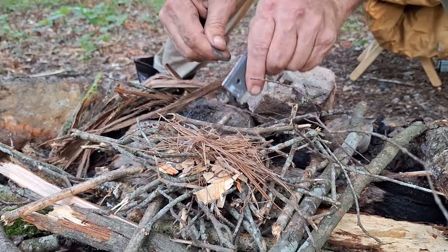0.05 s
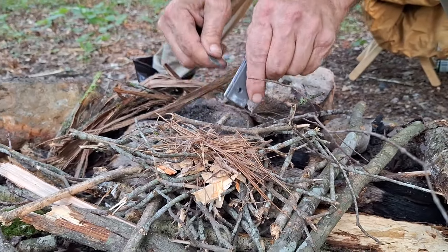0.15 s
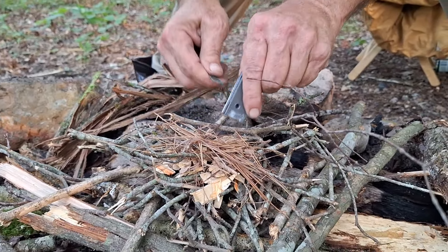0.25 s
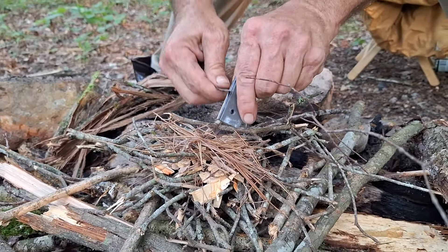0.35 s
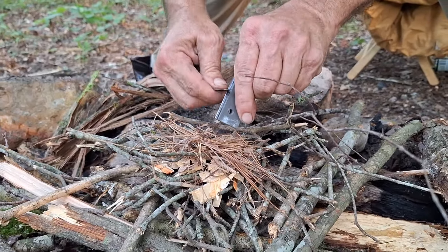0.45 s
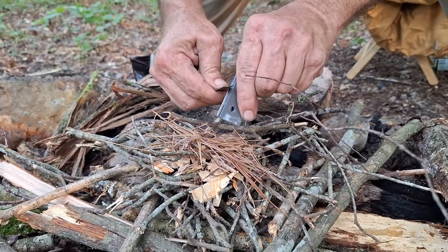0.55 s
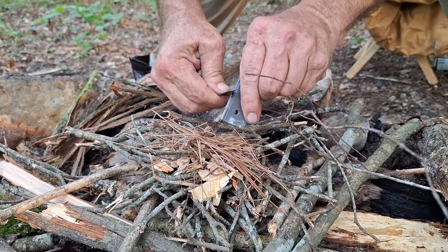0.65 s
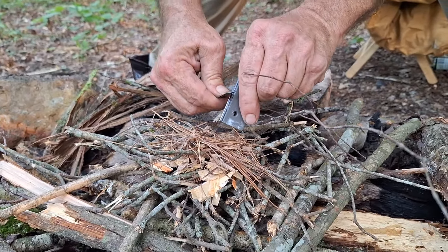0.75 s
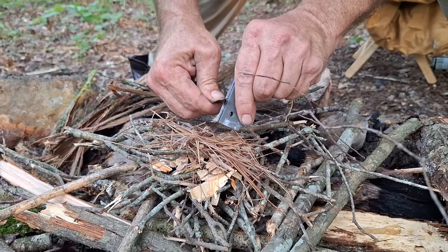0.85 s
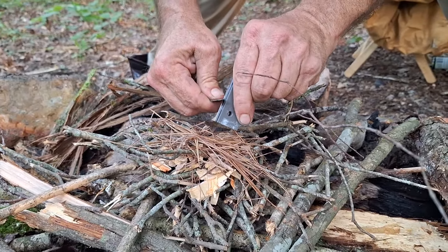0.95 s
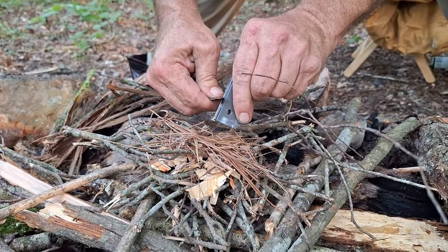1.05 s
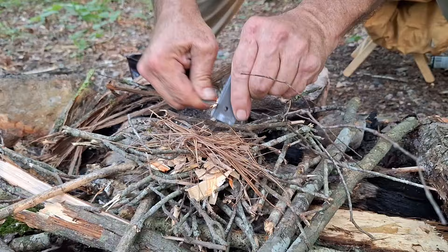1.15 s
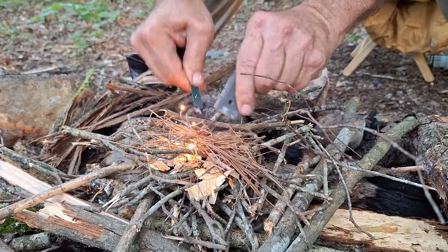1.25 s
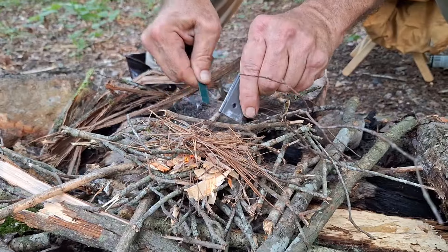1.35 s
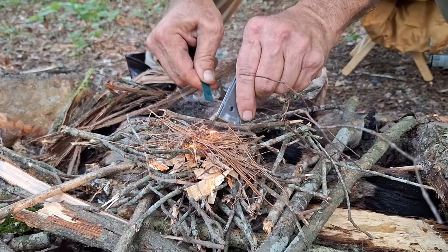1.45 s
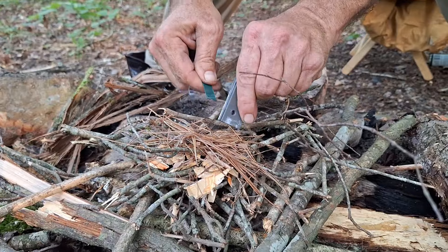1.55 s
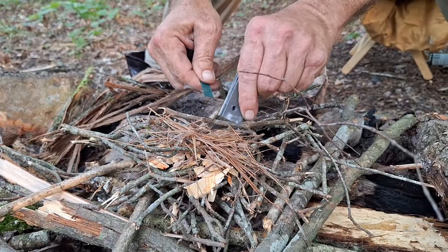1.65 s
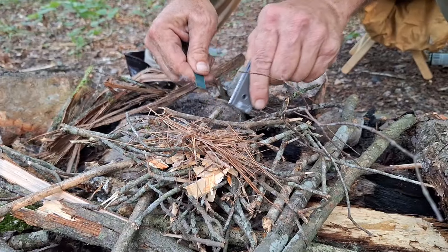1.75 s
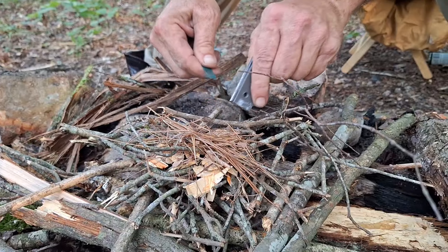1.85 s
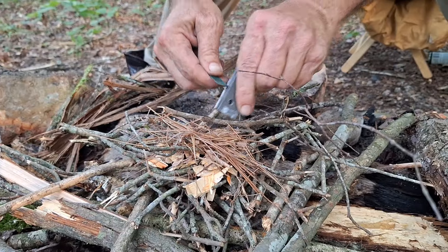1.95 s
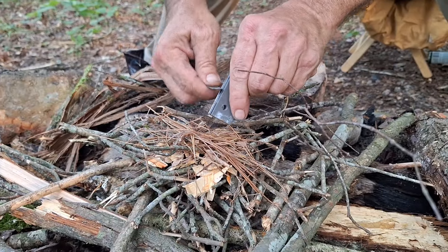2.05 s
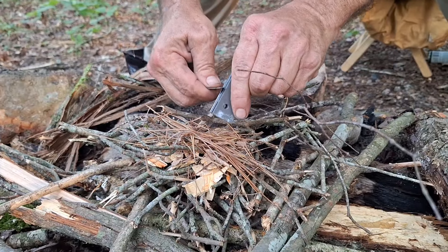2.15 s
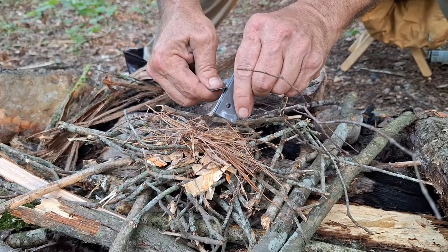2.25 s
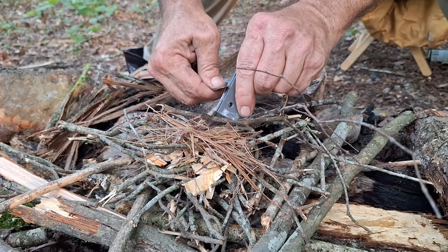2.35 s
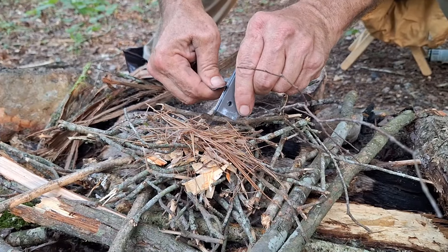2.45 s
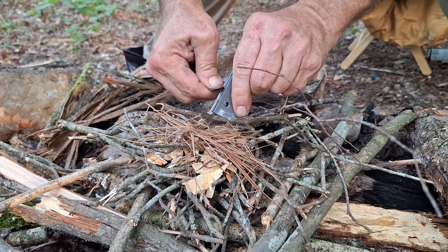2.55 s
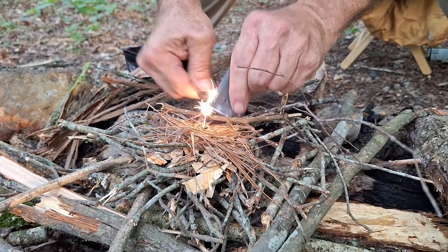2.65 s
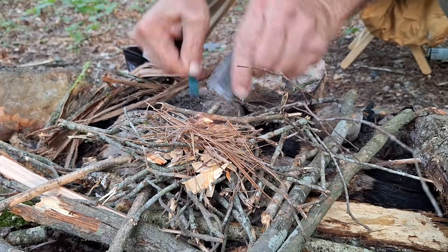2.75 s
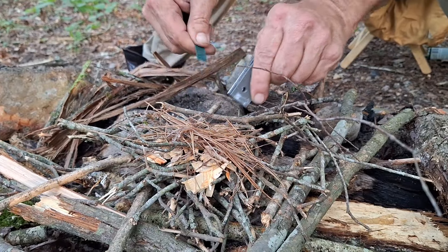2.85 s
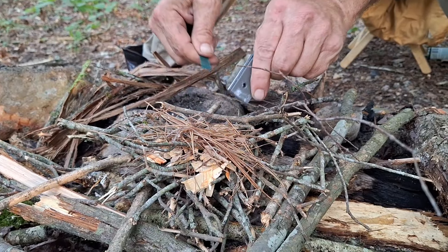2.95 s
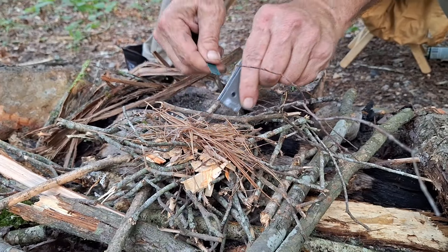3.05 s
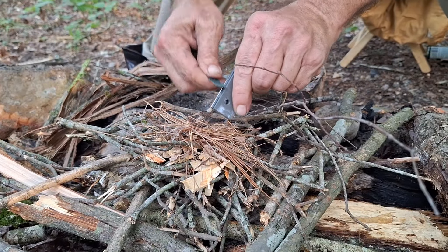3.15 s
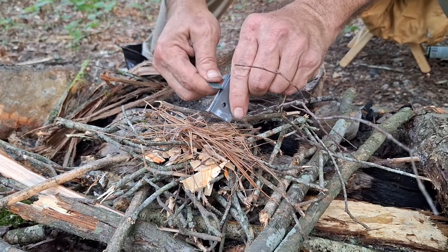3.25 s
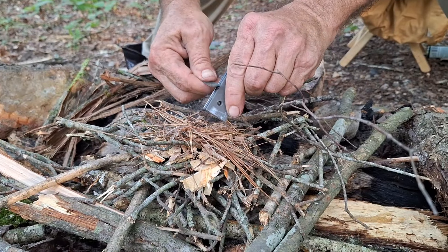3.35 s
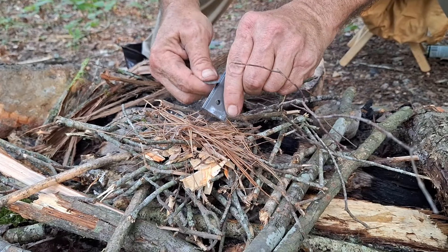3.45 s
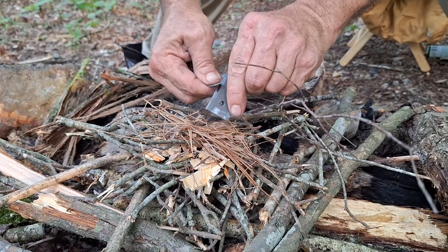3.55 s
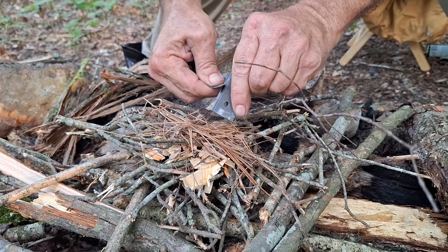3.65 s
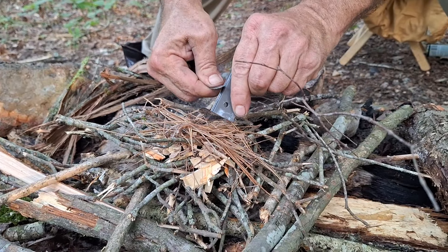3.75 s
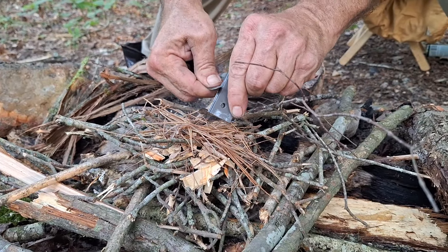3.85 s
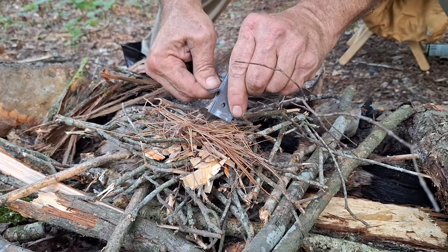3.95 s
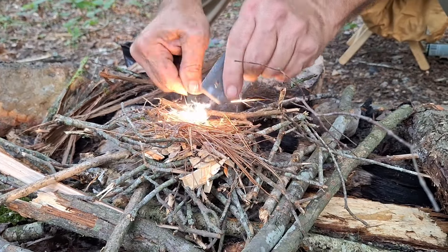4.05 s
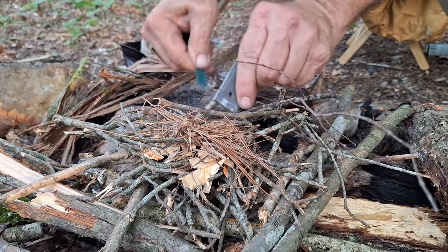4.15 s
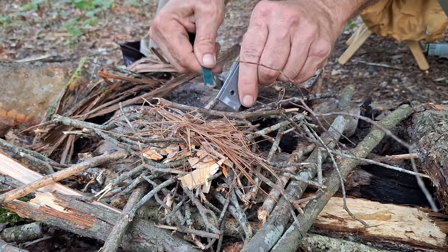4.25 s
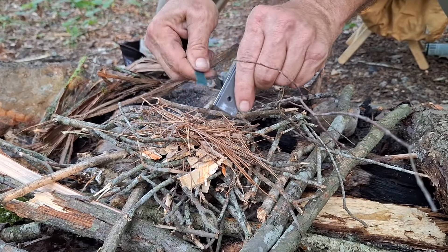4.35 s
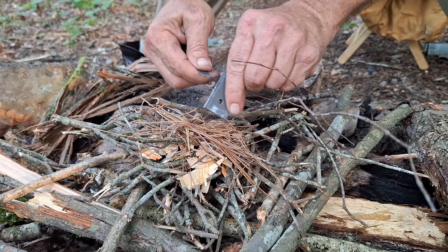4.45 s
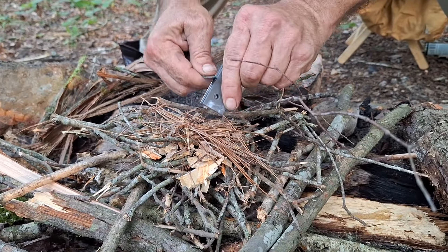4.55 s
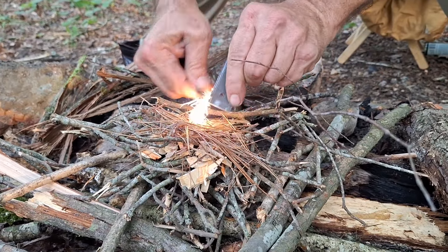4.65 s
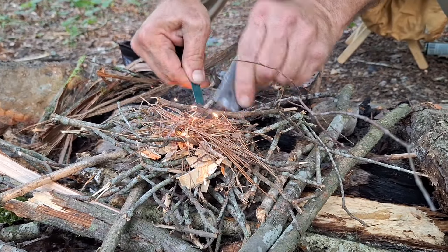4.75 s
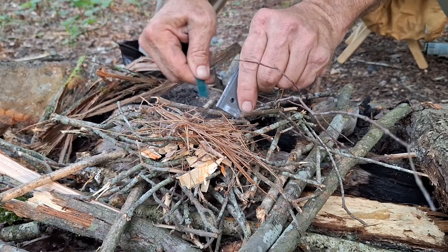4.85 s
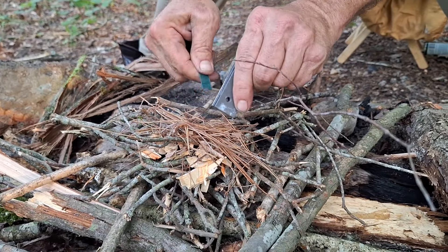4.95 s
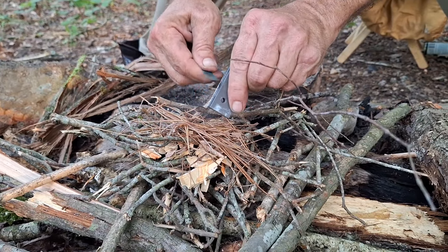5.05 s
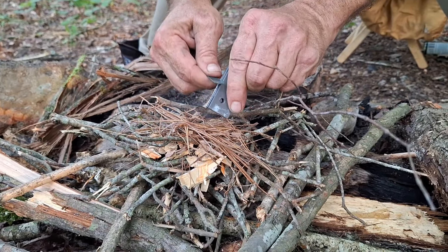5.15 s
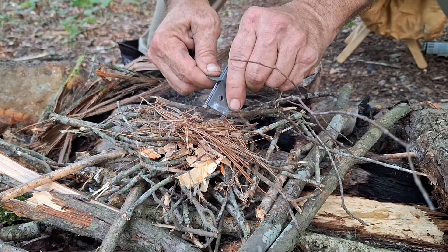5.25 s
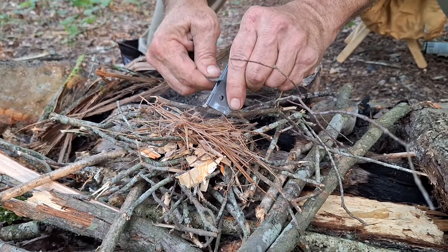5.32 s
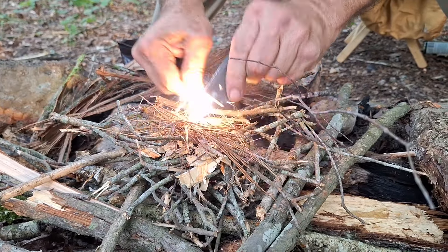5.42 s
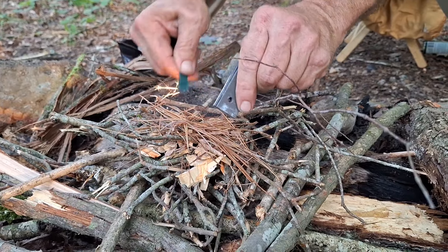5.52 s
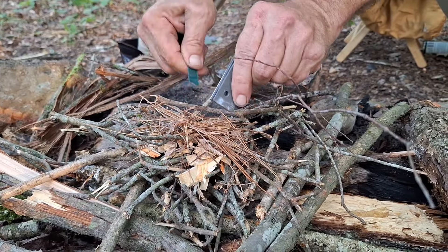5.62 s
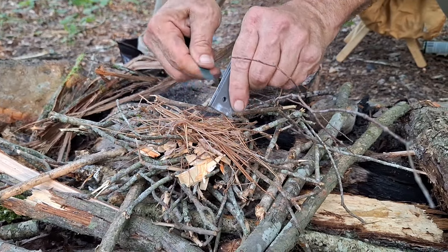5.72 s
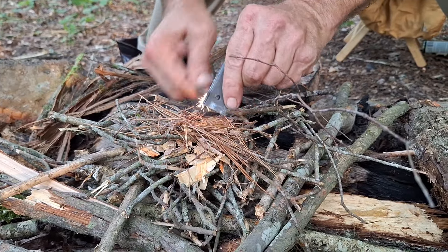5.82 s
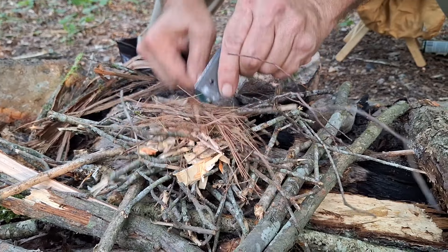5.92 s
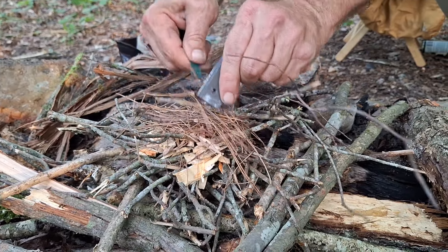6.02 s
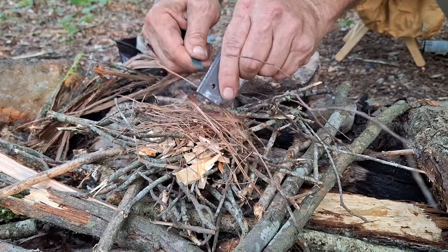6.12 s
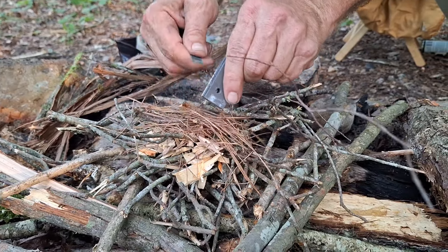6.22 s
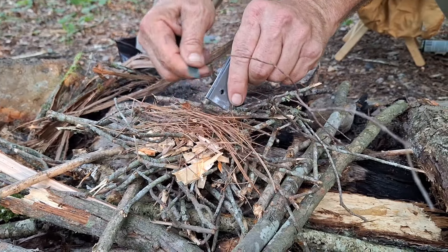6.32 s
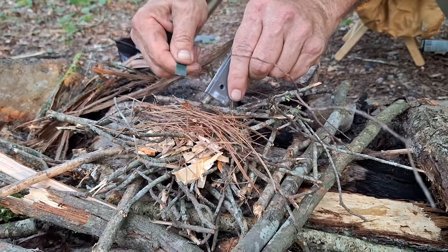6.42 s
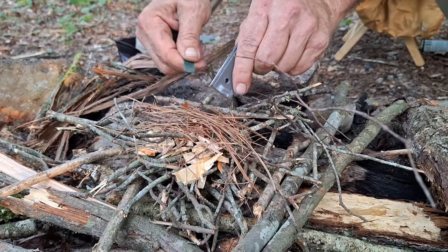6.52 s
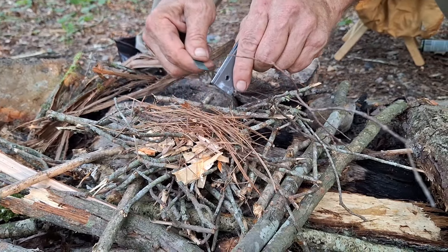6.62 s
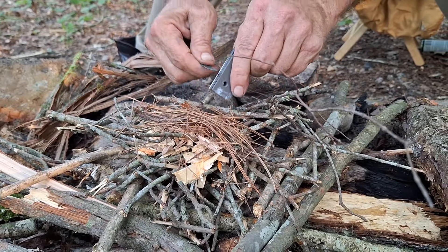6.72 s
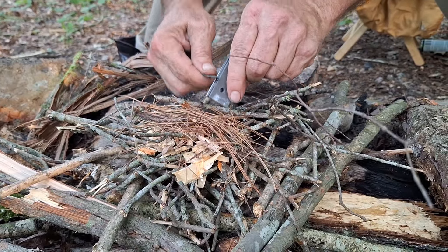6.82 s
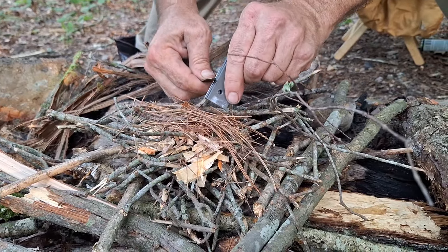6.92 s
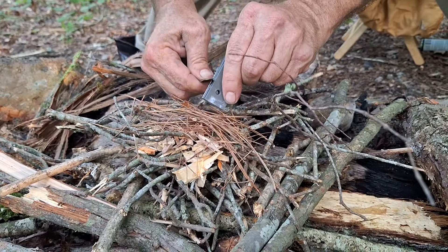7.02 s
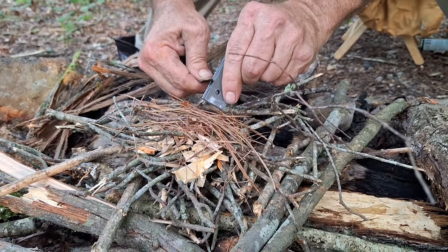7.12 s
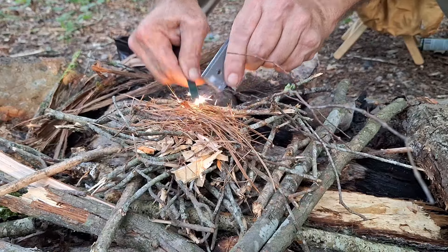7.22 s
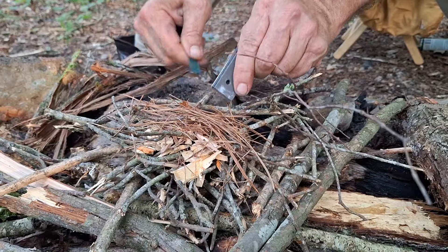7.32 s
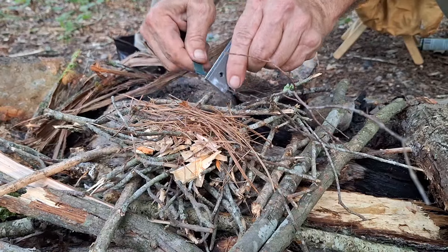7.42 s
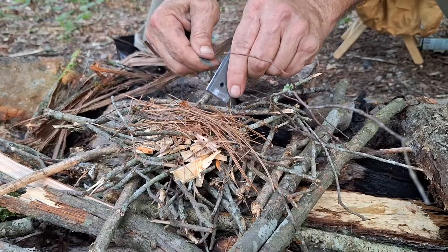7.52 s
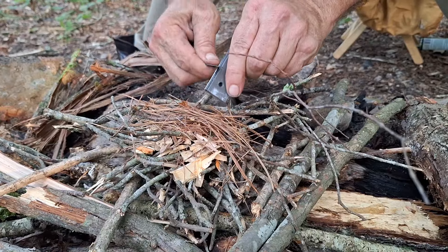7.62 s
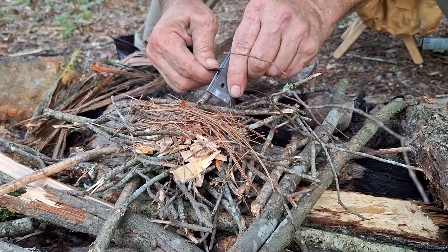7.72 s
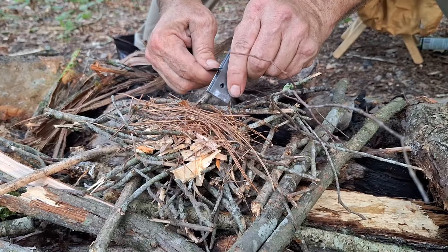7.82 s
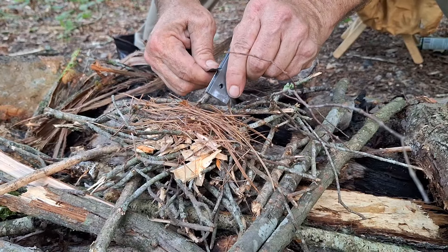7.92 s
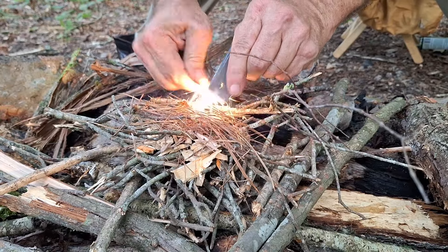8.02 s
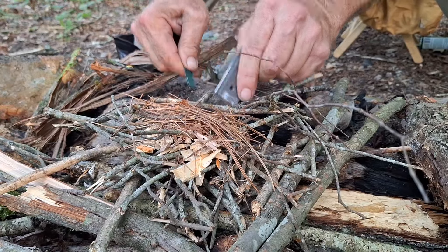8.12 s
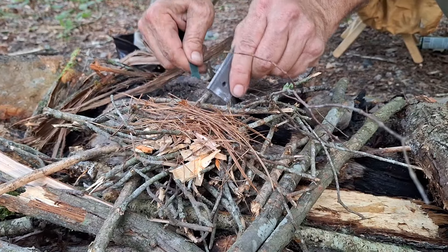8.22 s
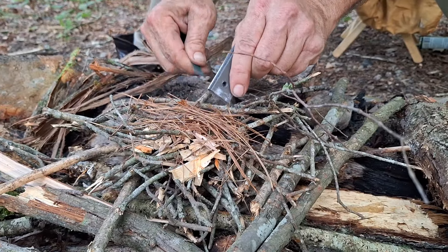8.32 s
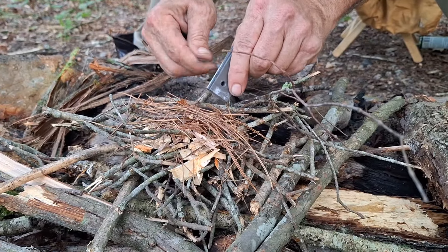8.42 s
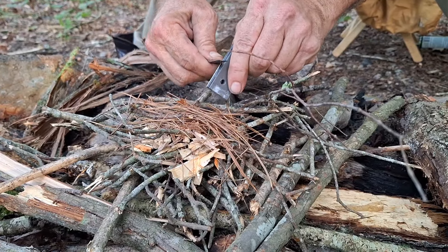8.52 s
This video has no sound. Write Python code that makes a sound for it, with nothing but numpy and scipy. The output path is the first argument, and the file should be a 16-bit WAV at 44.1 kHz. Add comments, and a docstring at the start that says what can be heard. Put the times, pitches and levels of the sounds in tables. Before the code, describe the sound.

A fire rod is struck over dry tinder: eight abrupt, harsh metal scrapes, each over in about a tenth of a second, starting slightly hesitantly then bursting into bright crackling sizzle with a soft low bump. Between them come small ticks, faint rubs and barely audible twig rustles. Close and dry, slightly stronger on the right, with little woodland echo, over quiet hiss, thin insect shimmer and two very faint high whistles.

```python
"""Dry litter rustles first, then a high whistle glides by and light knocks and rubs of steel come in.
From 1.2 s to 8.2 s a steel scraper is driven eight times down a ferro rod, close by, over dry tinder.
Each stroke is stick-slip noise and micro-impacts exciting ringing steel, with fizzing sparks and a thud.
A second whistle glides by near 6.5 s; more knocks, rubs and rustles fall between the strokes.
Throughout, filtered noise gives shrill insects and soft air, and a wavering low sine comes and goes."""
import sys
import numpy as np
from scipy import signal
from scipy.fft import rfft, irfft
from scipy.io import wavfile
from scipy.ndimage import uniform_filter1d

SR = 44100
rng = np.random.default_rng(int(sys.argv[2]) if len(sys.argv) > 2 else 0)


def master_out(mix):
    """Clip the mix to full scale and print it as 16-bit PCM to the path in sys.argv[1]."""
    frames = np.transpose(np.atleast_2d(mix))
    ceiling = np.clip(frames, -1, 1)
    pcm = np.round(ceiling * 32767).astype(np.int16)
    wavfile.write(sys.argv[1], SR, pcm)


N = 378276
HZ = np.fft.rfftfreq(4096, 1 / SR)  # grid on which filters are designed

# All levels are relative: the layer gains and filters below act on them too.
# Strokes: touch t/s, break-loose t/s, run/s, grinding level/dB, build-up/(dB/s), ease-off/(dB/s);
# above the grinding: creeping body/dB, running body/dB, spark fizz/dB, thud/dB;
# recoil: delay after the run/s, grinding level/dB, thud level/dB
STROKES = [(1.214, 1.264, 0.018, -38.5, 310, 520, -5.5, -0.5, 7.4, -7.5, 0.041, -42.5, -49),
           (2.715, 2.735, 0.029, -36.5, 872, 474, -7.5, -7, 7, -13.5, 0.022, -52.5, -46),
           (4.059, 4.100, .018, -37, 121.8, 487, -2.5, -3, 6.7, -9, .021, -52.5, -51),
           (4.686, 4.738, 0.037, -37.5, 321.3, 300.4, -2, -0.5, 10.8, -3, 0.024, -46, -50),
           (5.406, 5.455, 0.048, -38, 320, 728, -9.5, -2.5, 8.5, -9, 0.0096, -52.5, -63),
           (5.869, 5.903, .026, -35, 343, 560, -13, -4.5, 5.7, -18, 0.025, -56, -60),
           (7.21, 7.249, 0.025, -39.5, 431.6, 498, -3.5, -1.5, 6.6, -12, 0.023, -54, -49.5),
           (8.049, 8.099, 0.0087, -33.5, 372, 862, -1.5, -3, 7.6, -16, 0.045, -48.5, -49)]
# Hard snags of the edge on the rod: t/s, level/dB, brightness/dB
SNAGS = [(1.2179, -27, -3), (1.2319, -17.5, -4), (1.2451, -30, -1), (1.2638, -12, -0.5), (1.3201, -25, 11),
         (2.729, -28, -6), (2.7509, -6.5, 3.5), (2.7803, -20.5, 0), (4.0427, -29.5, 3), (4.0657, -27, 7),
         (4.092, -24, 11), (4.6918, -35, -15), (4.715, -20.5, -4), (4.721, -16.5, -10), (4.7286, -15, -7.5),
         (4.7434, -15, -1), (5.4312, -43, .5), (5.443, -17, -2), (5.4538, -10.5, -4), (5.8697, -33.5, 15),
         (5.887, -18, -4), (5.902, -27, 1), (5.9357, -24, 13), (7.219, -23.5, -25), (7.233, -24, -10),
         (7.2439, -18.5, -10), (7.2928, -26, 6.5), (8.0508, -30.5, 6), (8.0555, -19, -12),
         (8.0645, -20, -11), (8.0699, -13, -3), (8.0827, -12.5, 3), (8.0998, -6.5, -5), (8.1513, -28, 4)]
# Light knocks of scraper on rod: t/s, level/dB, brightness/dB, body/dB, decay/s
KNOCKS = [(0.29, -49.5, 13, 3, .0015), (0.4121, -36, -15, -10, 0.0033), (0.6726, -35, -4, -6, 0.0018),
          (1.4827, -16.5, 0.5, -20.5, 0.0027), (2.048, -38.5, -22, -10, 0.0023),
          (3.9927, -26, -7, -1, 0.0024), (4.0319, -39, -2, -2, .0015), (4.5849, -30.5, -5, -17.5, 0.0022),
          (5.5627, -37, 3, 3, 0.0019), (5.5726, -29.5, 7, 4, 0.0035), (6.1332, -36.5, -20, 3, 0.0018),
          (6.852, -48, 4, -11, .0014), (7.325, -35.5, 7, 6, 0.0017), (7.6895, -41, -6, -15, 0.0015),
          (8.042, -33, 4, -10, .0014), (8.554, -37.5, -5, -1, 0.0023)]
# Light slides of the scraper into place: t/s, length/s, level/dB, brightness/dB
RUBS = [(0.646, .012, -64.5, -10), (0.804, 0.019, -64, -2), (0.835, 0.073, -59, 5),
        (1.479, 0.0044, -45.5, 0), (3.293, 0.064, -70, -5), (3.988, 0.056, -61, -3),
        (5.573, 0.044, -60.5, 7), (6.126, 0.086, -72.5, -7), (8.566, 0.008, -49.5, -21)]
# Spectrum of steel on rod: f/Hz, level/(dB per Hz)
RASP_SPECTRUM = [(100, -33.5), (350, -10.5), (650, -4), (1200, -4), (1900, -1.5), (2500, -6), (2950, -4.5),
                 (3500, 3.5), (7500, 2), (9800, -1), (12200, 3.5), (14000, 7), (16000, 3.5)]
# Resonances of scraper and rod: f/Hz, width/Hz, level/dB
STEEL_MODES = [(662, 170, -11.5), (1850, 90, 2.5), (3440, 170, -25), (4810, 150, -12.5), (5270, 139, -5),
               (8600, 240, -4.5), (10750, 370, -6.5), (13950, 290, -8), (14730, 200, 1.5)]
# Resonances that change with grip and footing: t/s, f/Hz, width/Hz, level/dB
GRIP_MODES = [(1.28, 14550, 397, -3), (2.76, 1000, 400, 0), (2.76, 7780, 350, 4), (2.76, 8800, 300, -1),
              (2.759, 14800, 298, -8), (4.768, 163.5, 70, 5), (4.77, 693, 198.5, -3.5),
              (5.48, 4340, 200, 0.5), (5.48, 8560, 250, -14.5), (5.919, 308, 59.5, 9),
              (5.92, 2080, 70.25, -1), (5.92, 8650, 300, -13), (7.27, 10710, 149.7, 0),
              (8.101, 1895, 148.7, -2), (8.099, 4620, 250, -12), (8.10, 9000, 180, -3)]
# Stereo balance of the steel, right mostly louder: f/Hz, left minus right level/dB
STEEL_BALANCE = [(100, -4), (600, 0.5), (1200, -1), (2000, -7.5), (2700, -3.5), (4000, -11.5), (6500, -7.5),
                 (9000, -17.5), (11000, -16), (15000, -16.5)]
# Spectrum of the ground under the rod: f/Hz, level/(dB per Hz)
GROUND_SPECTRUM = [(20, -34), (50, -2), (82, -1), (115, -2), (165, 0), (260, -5.5), (385, -10.5), (520, -7),
                   (1000, -12), (3000, -45)]
# Shifts of twigs and litter under the hands: t/s, length/s, level/dB
RUSTLES = [(0.0, 0.065, -65), (0.818, 0.15, -67.5), (3.44, 0.27, -74), (3.643, 0.44, -77.5),
           (4.188, 0.0051, -52.5), (5.96, 0.18, -73.5), (7.453, 0.15, -75)]
# Spectrum of the litter: f/Hz, level/(dB per Hz)
LITTER_SPECTRUM = [(60, -5), (200, 6), (480, 1.5), (800, -11), (2000, -5), (4000, -10), (12000, -16)]
# Reverberation of the trees: f/Hz, t60/s
WOODS_DECAY = [(100, 1), (1000, 0.52), (5000, 0.41), (15000, 0.37)]
# Insect chorus: f/Hz, level/(dB per Hz)
INSECT_SPECTRUM = [(4800, -44), (5600, -21.5), (5950, -12), (6150, -2.5), (6450, 2), (6850, -5),
                   (7300, 0.5), (7600, -7.5), (7950, -17.5), (8600, -34.5), (10000, -67)]
# Outdoor air: f/Hz, level/(dB per Hz)
AIR_SPECTRUM = [(20, -3.5), (70, 16.5), (150, 4), (260, 4.5), (600, -1), (1350, -3.5), (1850, 2.5),
                (2300, 6.5), (3400, -2.5), (5200, -6), (8500, -2.5), (11000, -5.5), (14200, 4), (16000, -9)]
# Stereo balance of the air: f/Hz, left minus right level/dB
AIR_BALANCE = [(60, -9.5), (110, 4), (200, 9), (380, 4), (700, 3), (1290, 0), (2380, -12.5), (4400, -4.5),
               (8120, -13.5), (15000, -15)]
# Coherence of the air between left and right: f/Hz, likeness
AIR_COHERENCE = [(60, 0.27), (300, 0.058), (1200, 0.13), (16000, 0.066)]
# Gliding whistles, one table each: t/s, f/Hz, level/dB
WHISTLES = [
    [(0.16, 11000, -82), (0.2, 11180, -71), (0.26, 11600, -80), (0.31, 11200, -75), (0.34, 10600, -76),
     (0.38, 10400, -72)],
    [(6.47, 10150, -91.5), (6.52, 11600, -81), (6.55, 12200, -76), (6.615, 10100, -78), (6.7, 8300, -87)],
]
# Course of the low hum: t/s, level/dB
HUM_LEVEL = [(0.0, -68), (0.09, -92), (0.2, -77), (0.59, -93), (0.91, -68), (1.61, -93.5), (1.81, -86),
             (2.11, -92), (2.72, -95), (2.989, -75), (3.08, -90), (3.579, -73), (4.22, -81), (4.688, -94),
             (4.88, -98), (5.01, -72), (5.12, -95), (5.311, -92), (5.44, -66), (5.58, -86), (5.8, -88),
             (6.01, -73), (6.239, -73.5), (6.49, -91), (6.941, -78), (7.55, -75), (7.78, -88.5),
             (8.05, -66), (8.3, -88), (8.57, -69)]

BREAK_DB, SAG_DB_PER_S = 5, 79  # jump as the edge breaks loose, loss of pressure along the run
SPARK_LAG_S = 0.002  # the chips take a moment to flare
THUD_BUILD_DB_PER_S, THUD_FALL_DB_PER_S = 770, 620
THUD_LEAD_S, THUD_HOLD_S = 0.0091, 0.013  # full this long before the run ends, and stays so this long
RECOIL_RISE_DB_PER_S, RECOIL_FALL_DB_PER_S = 1296.5, 580.5  # the hand springs back and grazes the rod
RECOIL_BODY_DB, RECOIL_FIZZ_DB = -3.5, 2.5  # above the recoil's grinding
LIFT_S, LIFT_DB_PER_S = .024, 297.5  # this long after the recoil the edge leaves the rod
CATCH_BODY_DB, CATCH_DECAY_S = -2.5, 0.0017  # low knock of a catch before the brightness trade, and decay
BODY_PER_BRIGHT = .35  # the brighter a catch, the less it knocks (dB per dB)
CHIPS_PER_S, CHIP_WINDOW_S = 75, .052  # mean rate of small snags, and how long they go on after the run
CHIP_DB, CHIP_SPREAD_DB, CHIP_BRIGHT_DB = 5.5, 4.5, 8  # peak above the fizz, spread each way, brightness
HUM_HZ = 147.6  # mean pitch
EDGE_HZ = 15900  # upper band limit


def stroke_gains():
    """Energy addition: run and short recoil sum in power, then the lift fades body, grind, fizz and thud."""
    gains = np.zeros((4, N))
    for (touch, loose, run, db, build, ease, creep_body, run_body, fizz, thud,
         recoil_s, recoil_db, recoil_thud_db) in STROKES:
        t = np.arange(touch - .02, touch + .3, 1 / SR)
        after = t - loose - run
        grind = db + pressure(t, touch, loose, run, build, ease)
        sparks = db + pressure(t, touch, loose + SPARK_LAG_S, run, build, ease)
        push = db + peaked(after + THUD_LEAD_S, THUD_BUILD_DB_PER_S, THUD_FALL_DB_PER_S, THUD_HOLD_S)
        body = grind + np.where(t < loose, creep_body, run_body)
        forward = amp([body, grind, sparks + fizz, push + thud])

        recoil = peaked(after - recoil_s, RECOIL_RISE_DB_PER_S, RECOIL_FALL_DB_PER_S)
        graze = recoil_db + recoil
        back = amp([graze + RECOIL_BODY_DB, graze, graze + RECOIL_FIZZ_DB, recoil + recoil_thud_db])
        lift = amp(-LIFT_DB_PER_S * np.maximum(after - recoil_s - LIFT_S, 0))
        add(gains, t[0], np.hypot(forward, back) * lift)
    return gains


def pressure(t, touch, loose, run, build, ease, rise_s=.0015):
    """Static, then sliding friction in dB: touch, creep under growing force, break loose, run, ease off."""
    jump = BREAK_DB * np.clip((loose - t) / rise_s, 0, 1)
    creeping = build * np.maximum(loose - t, 0) + jump
    running = SAG_DB_PER_S * np.clip(t - loose, 0, run) + ease * np.maximum(t - loose - run, 0)
    before_touch = 20 / np.log(10) * np.maximum(touch - t, 0) / rise_s
    return -creeping - running - before_touch


def peaked(age, rise_db_per_s, fall_db_per_s, hold_s=0):
    """Exponential growth and decay: a level in dB climbs to 0 at age 0, holds and falls."""
    return rise_db_per_s * np.minimum(age, 0) - fall_db_per_s * np.maximum(age - hold_s, 0)


def scraping(gains, body_db=11, grind_db=6, fizz_db=-1, chip_db=-0.5, shift_db=1.82):
    """Friction noise: the chattering edge tears off chips; the burning chips fizz on top."""
    chips = evened(amp(chip_db * wander(5200)))
    grains = registers(rng.standard_normal((2, N)) * chips) * teeth(gains[1])
    # the bite keeps changing colour
    levels = [amp(db + shift_db * wander(190)) for db in (body_db, grind_db, fizz_db)]
    return sum(band * gain * level for band, gain, level in zip(grains, gains, levels))


def teeth(force, rate_hz=400, full_db=-40, jitter=.4, size_db=-0.5, hold=1.0):
    """Stick-slip: each tooth bites at once and eases off; a light edge stutters, a forceful one runs on."""
    speed = np.clip(force / amp(full_db), .05, 1) ** .3
    turns = np.cumsum(rate_hz * speed * np.exp(jitter * wander(150))) / SR
    sizes = amp(size_db * rng.standard_normal(N))[turns.astype(int)]
    bite = hold * speed ** 2 + sizes * np.exp(-(turns % 1) / .3)
    return bite / np.sqrt(uniform_filter1d(bite ** 2, size=700) + 1e-9)  # local rms 1


def stalls(snags, depth, lead_s=0.0038, width_s=.002):
    """Static friction: the edge hangs just before each catch breaks loose, so the grinding gaps."""
    t, free = np.arange(N) / SR, np.ones(N)
    for s, *_ in snags:
        near = slice(int((s - .02) * SR), int((s + .01) * SR))
        dip = np.exp(-((t[near] - s + lead_s) / width_s) ** 2)
        free[near] *= 1 - np.clip(depth, 0, 1) * dip
    return free


def rub_gains(body_db=-12):
    """Light sliding friction: gains of body, grinding and fizz without pressure."""
    gains = np.zeros((3, N))
    for s, length, db, bright_db in RUBS:
        add(gains, s, amp([[db + body_db], [db], [db + bright_db]]) * swell(length))
    return gains


def small_catches(fizz):
    """Random point process: the edge keeps snagging along the run, its level following the spark fizz."""
    rows = []
    for _, loose, run, *_ in STROKES:
        gaps, sizes = rng.uniform(.5, 1.5, 24), rng.uniform(-1, 1, 24)
        for s, size in zip(loose + np.cumsum(gaps) / CHIPS_PER_S, sizes):
            if s < loose + run + CHIP_WINDOW_S:
                fizz_db = 20 * np.log10(fizz[int(s * SR)] + 1e-9)
                rows.append((s, fizz_db + CHIP_DB + CHIP_SPREAD_DB * size, CHIP_BRIGHT_DB))
    return rows


def catches(rows, level_db=-4):
    """Impulsive excitation: each snag or knock is a cluster of micro-impacts that builds and dies fast."""
    t, bursts = np.arange(900) / SR, np.zeros((3, 2, N))
    snags = []
    for s, db, bright_db in rows:
        body_db = CATCH_BODY_DB - BODY_PER_BRIGHT * bright_db
        snags.append((s, db, bright_db, body_db, CATCH_DECAY_S))
    signs = rng.choice([-1., 1.], (256, 2, len(t)))
    for (s, db, bright_db, body_db, decay), impacts in zip(list(KNOCKS) + snags, signs):
        age = t / max(decay, 1e-4)
        shape = (1 - np.exp(-age / .6)) * np.exp(-age)
        band_gains = amp([body_db, 0, bright_db])[:, None, None]
        add(bursts, s, band_gains * impacts * shape * amp(db + level_db))
    # keep from each burst only the register it was scaled for
    return sum(registers(x)[k] for k, x in enumerate(bursts))


def gripped(drive, reach_s=0.13):
    """Boundary conditions: grip and footing add resonances, each excited near one time only."""
    out = drive.copy()
    for s, hz, width, db in GRIP_MODES:
        part = drive[:, round((s - reach_s) * SR):round((s + reach_s) * SR)]
        ringing = signal.lfilter(*signal.iirpeak(hz, hz / width, fs=SR), part)
        add(out, s - reach_s, amp(db) * ringing)
    return out


def steel(drive):
    """Modal resonance: scraper and rod colour and ring with whatever excites them."""
    ring = 1 + sum(amp(db) / (1 + 2j * (HZ - hz) / width) for hz, width, db in STEEL_MODES)
    db = read(RASP_SPECTRUM, HZ) + 20 * np.log10(abs(ring))
    sides = ears(read(STEEL_BALANCE, HZ))
    return np.array([colour(x, db + side) for x, side in zip(pair(*drive), sides)])


def thuds(push, level_db=-1, apart=0.31):
    """Structure-borne transmission: the rod's tip passes each push into the ground and the twigs."""
    both, unlike = (evened(colour(rng.standard_normal(N), read(GROUND_SPECTRUM, HZ))) for _ in range(2))
    return amp(level_db) * push * np.array([both + apart * unlike, both - apart * unlike])


def litter(grain_db=3):
    """Granular friction: the dry pile shifts in soft, dull rustles of uneven noise."""
    gain = np.zeros(N)
    for s, length, db in RUSTLES:
        add(gain, s, amp(db) * swell(length))
    grains = rng.standard_normal((2, N)) * amp(grain_db * wander(170))
    return gain * np.array([evened(colour(x, read(LITTER_SPECTRUM, HZ))) for x in pair(*grains)])


def woods(x, wet_db=-25):
    """Reverberation: sparse echoes from ground and trunks, each band dying at its own speed."""
    taps = rng.standard_normal((2, SR // 2)) * (rng.random((2, SR // 2)) < 2500 / SR)  # 2500 echoes/s
    hz, t, z = signal.stft(taps, SR, nperseg=256)
    decay = amp(-60 * t / read(WOODS_DECAY, hz)[:, None])
    tail = signal.istft(z * decay, SR, nperseg=256)[1]
    return amp(wet_db) * signal.fftconvolve(x, tail / np.linalg.norm(tail[0]), axes=1)[:, :N]


def insects(level_db=-58.0, side_db=-12):
    """Incoherent summation: many far insects merge into one shrill, slightly throbbing noise band."""
    band = np.array([evened(colour(rng.standard_normal(N), read(INSECT_SPECTRUM, HZ))) * amp(side)
                     for side in ears(side_db)])
    throb_db = .35 * wander(40) + .2 * wander(2)
    return band * amp(level_db + throb_db)


def air(level_db=-67, swell_db=1.24, bass_swell_db=-0.3, bass_hz=600):
    """Partly coherent noise field: soft outdoor hiss whose treble and bass drift separately."""
    a, b = rfft(rng.standard_normal((2, N)))
    same = np.clip(read(AIR_COHERENCE, np.fft.rfftfreq(N, 1 / SR)), -1, 1)
    ports = irfft([a, same * a + np.sqrt(1 - same ** 2) * b], N)
    high = treble(ports, bass_hz)
    low = ports - high
    ports = high * amp(swell_db * wander(5.2)) + low * amp(bass_swell_db * wander(9))
    sides = ears(read(AIR_BALANCE, HZ))
    return amp(level_db) * np.array([colour(x, read(AIR_SPECTRUM, HZ) + side)
                                     for x, side in zip(ports, sides)])


def whistles(level_db=-2.0, waver=.018, side_db=-10):
    """Frequency modulation: faint, very high gliding sines with a slight tremble of pitch."""
    out, tremble = np.zeros(N), 1 + waver * wander(60)
    for rows in WHISTLES:
        s, hz, db = np.transpose(rows)
        t = np.arange(s[0], s[-1], 1 / SR)
        pitch = np.interp(t, s, hz) * tremble[:len(t)]
        tone = np.sin(2 * np.pi * np.cumsum(pitch) / SR)
        gain = 2 * amp(level_db + np.interp(t, s, db))
        add(out, s[0], gain * tone * signal.windows.tukey(len(t), .1))
    return out * amp([[side_db], [0]])  # quieter on the left


def hum(level_db=1.5, waver=.02, flutter_db=1.4):
    """Amplitude and frequency modulation: a faint wavering sine that swells and fades."""
    s, db = np.transpose(HUM_LEVEL)
    gain = amp(level_db + np.interp(np.arange(N) / SR, s, db) + flutter_db * wander(15))
    pitch = HUM_HZ * (1 + waver * wander(16))
    return gain * np.sqrt(2) * np.sin(2 * np.pi * np.cumsum(pitch) / SR)


def registers(x, body_hz=2500, fizz_hz=9300):
    """Band splitting: divides x into body, grinding and fizz that sum to x."""
    above, top = treble(x, body_hz), treble(x, fizz_hz)
    return np.array([x - above, above - top, top])


def treble(x, edge_hz):
    """High-pass filtering: the part of x above edge_hz, without phase shift."""
    hz = np.fft.rfftfreq(N, 1 / SR)
    return irfft(rfft(x) * (1 - 1 / (1 + (hz / edge_hz) ** 8)), N)


def colour(x, db):
    """Minimum phase: a causal filter, made by folding the cepstrum, with the gains db on the grid HZ."""
    cepstrum = irfft(np.log(amp(db)))
    cepstrum[1:len(HZ) - 1] *= 2
    cepstrum[len(HZ):] = 0
    return signal.oaconvolve(x, irfft(np.exp(rfft(cepstrum))))[:N]


def pair(x, y, same_hz=1500):
    """Spatial coherence: two ports share the wave in the bass and differ in the treble."""
    same = 1 / (1 + (np.fft.rfftfreq(N, 1 / SR) / same_hz) ** 2)
    return irfft(same * rfft(x) + np.sqrt(1 - same ** 2) * rfft(y), N), x


def ears(side_db):
    """Power conservation: left and right gains in dB that keep the mean power."""
    right = -10 * np.log10((1 + amp(side_db) ** 2) / 2)
    return right + side_db, right


def wander(rate_hz):
    """Low-passed noise: a smooth random signal of rms 1, changing up to about rate_hz times a second."""
    hz = np.fft.rfftfreq(N, 1 / SR)
    return evened(irfft(rfft(rng.standard_normal(N)) / (1 + (hz / rate_hz) ** 4), N))


def swell(length_s):
    """Half-sine envelope: a smooth rise and fall."""
    return np.sin(np.linspace(0, np.pi, int(max(length_s, .002) * SR)))


def read(points, hz):
    """Logarithmic frequency scale: interpolates a spectrum along it."""
    f, value = np.transpose(points)
    return np.interp(np.log(hz + 1), np.log(f + 1), value)


def amp(db):
    """Decibel law: level to amplitude gain."""
    return 10 ** (np.asarray(db) / 20)


def evened(x):
    """Power normalisation: scales to rms 1."""
    return x / np.sqrt(np.mean(x ** 2) + 1e-20)


def add(mix, s, sound):
    """Superposition: mixes a sound in at s seconds."""
    part = mix[..., round(s * SR):][..., :sound.shape[-1]]
    part += sound[..., :part.shape[-1]]


def scene():
    """Superposition of near and far: strokes, thuds and litter close by, the woods behind."""
    body, grind, fizz, push = stroke_gains()
    small = small_catches(fizz)
    free = stalls(SNAGS, depth=.62) * stalls(small, depth=.25)
    sliding = np.array([body, grind, fizz]) * free + rub_gains()
    drive = scraping(sliding) + catches(list(SNAGS) + small)
    near = steel(gripped(drive)) + thuds(push) + litter()
    return near + woods(near) + air() + insects() + whistles() + hum()


def record(dry):
    """Band limitation: a linear-phase low-pass at the recorder's upper edge."""
    low_pass = signal.firwin(511, EDGE_HZ, window=("kaiser", 9), fs=SR)
    return signal.oaconvolve(dry, low_pass[None], "same")


dry = scene()
out = record(dry)
master_out(out)
```